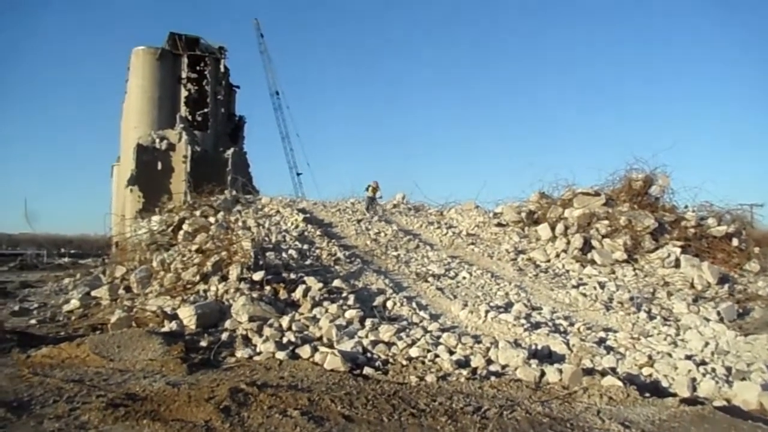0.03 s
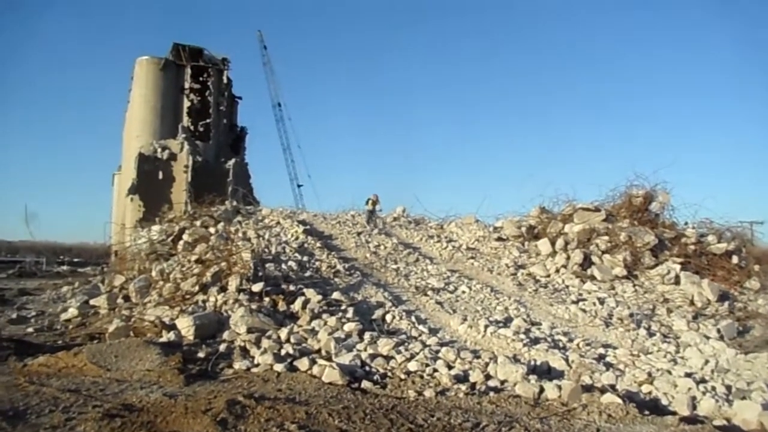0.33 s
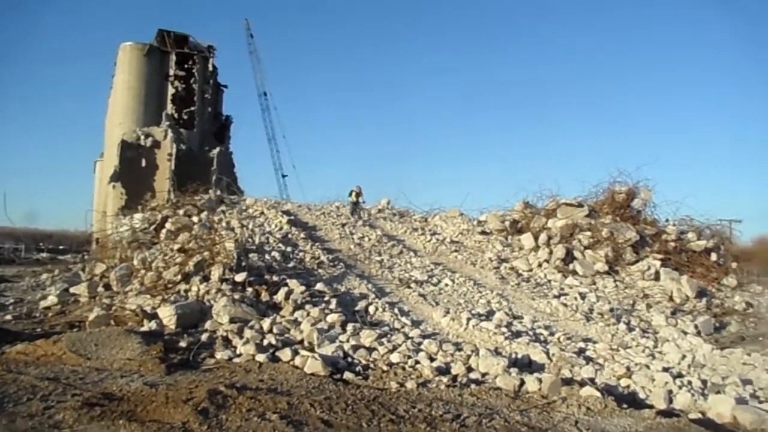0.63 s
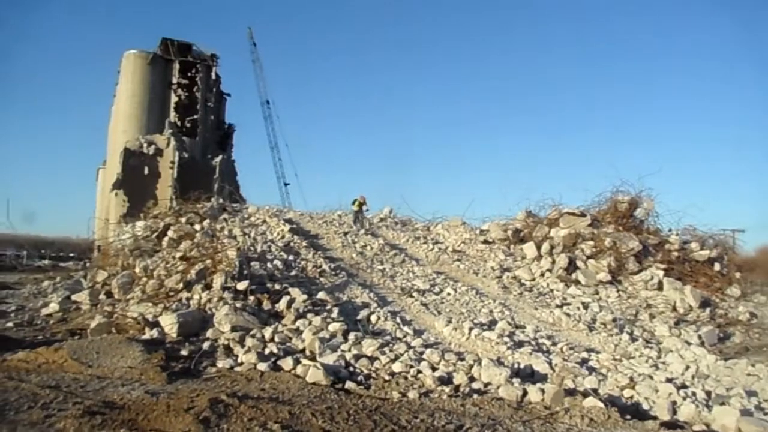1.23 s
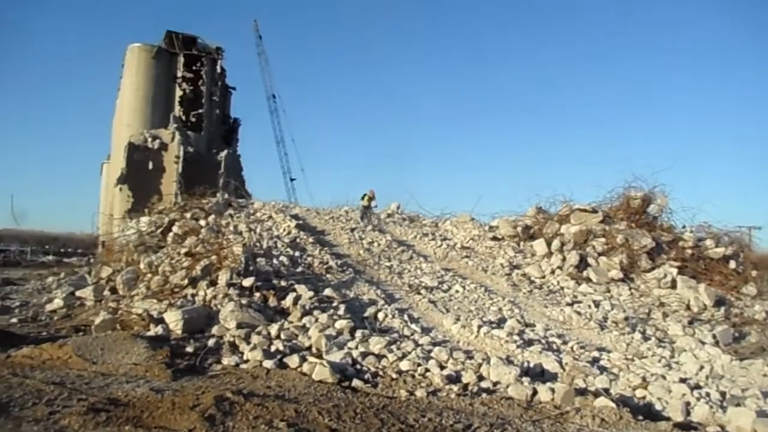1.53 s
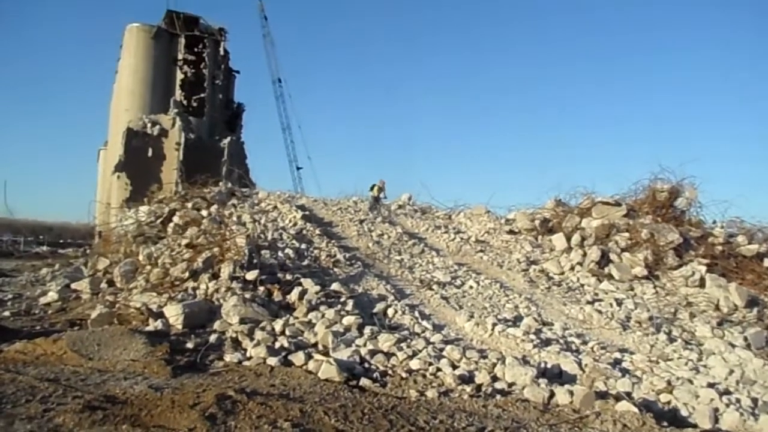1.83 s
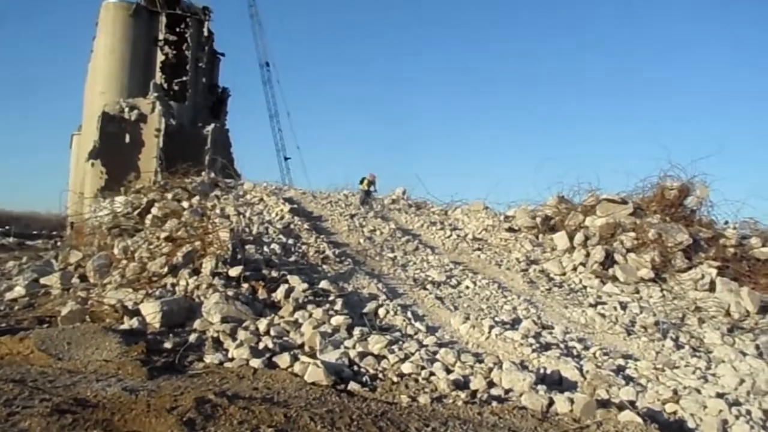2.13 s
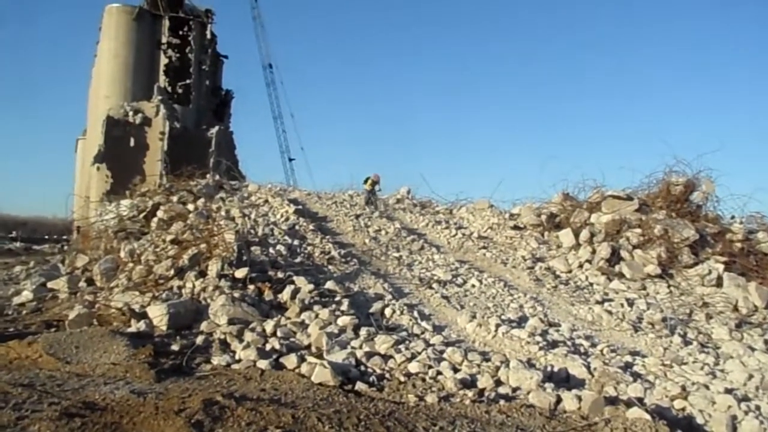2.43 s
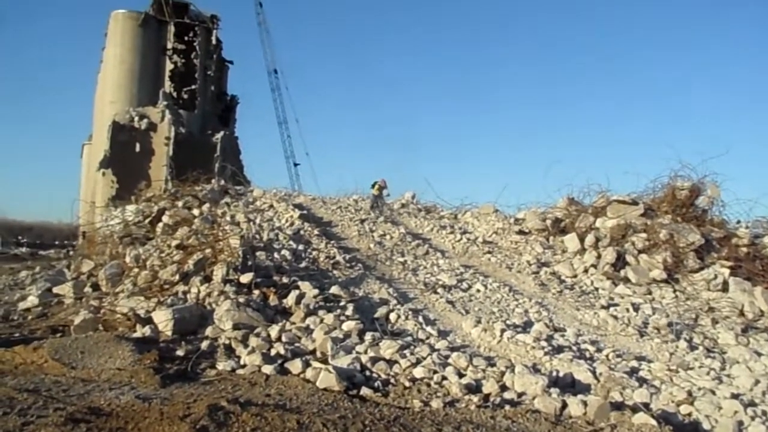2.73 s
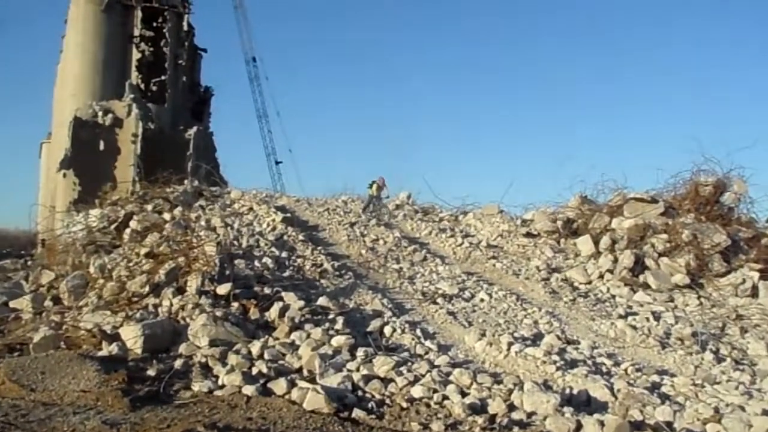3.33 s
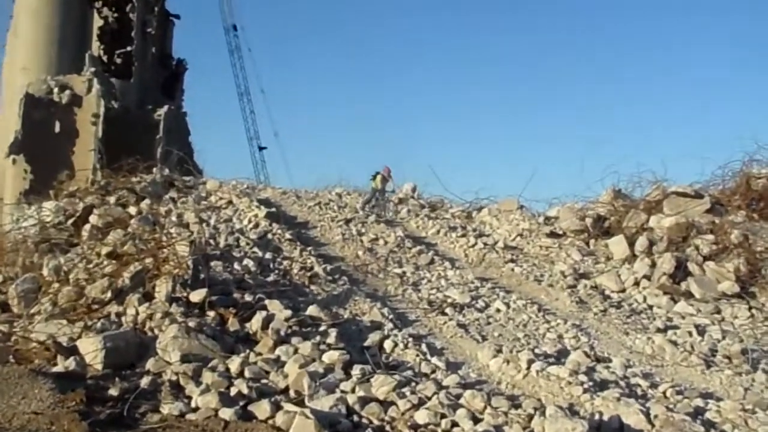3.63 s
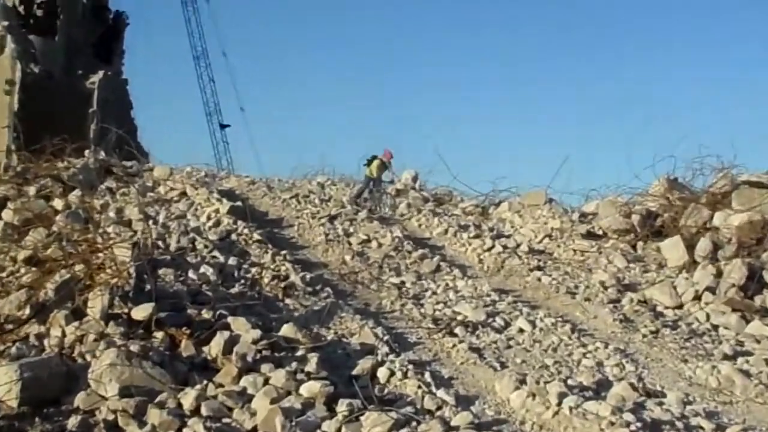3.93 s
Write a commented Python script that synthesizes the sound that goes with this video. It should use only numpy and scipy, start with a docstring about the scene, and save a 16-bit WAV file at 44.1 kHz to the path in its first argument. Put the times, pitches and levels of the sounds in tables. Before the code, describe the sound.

Wind rumbles on the microphone throughout, over a faint wash and hum of distant machinery. A camera zoom whirrs softly from 1.1 to 2.1 seconds and from 3.1 to the end, with small ticks. At 1.8 seconds a sharp, close click ducks everything, which swells back over two seconds. Stones clack lightly around 0.6 and from 2 to 2.8 seconds. Faint bird whistles come at the start and after 2.4.

```python
"""At a demolition site, wind turbulence rumbles on the microphone of a hand-held camera, over the wash
and thin hum of distant machinery, a few stony clacks and faint bird whistles. The zoom gears whirr
twice, with the sound folded to mono, and the casing gives small ticks. One sharp click rings the
casing and makes the gain control duck everything; the scene then swells back over two seconds."""
import sys
import numpy as np
from scipy import signal
from scipy.fft import rfft, irfft
from scipy.io import wavfile
from scipy.ndimage import minimum_filter1d

SR = 44100
rng = np.random.default_rng(int(sys.argv[2]) if len(sys.argv) > 2 else 0)


def master(y):
    """Save y as 16-bit WAV."""
    cut = np.clip(np.atleast_2d(y).T, -1, 1)
    pcm = np.round(cut * 32767)  # scale
    wavfile.write(sys.argv[1], SR, pcm.astype(np.int16))


N = 176400
T = np.arange(N) / SR
BIN_HZ = np.arange(N // 2 + 1) * SR / N
SIDE = np.array([[1], [-1]])  # opposite signs for left and right

def from_db(db):
    """Amplitude ratio: tenfold for every 20 dB."""
    return 10 ** (np.asarray(db) / 20)

def rms_one(x):
    """Normalisation to unit power."""
    return x / np.sqrt(np.mean(x ** 2) + 1e-20)

def noise(spectrum):
    """Spectral shaping: unit-power noise, falling 24 dB per octave beyond the end points."""
    hz, db = np.transpose(spectrum)
    octave, known = np.log2(np.maximum(BIN_HZ, 1)), np.log2(hz)
    beyond = np.abs(octave - np.clip(octave, known[0], known[-1]))
    gain = from_db(np.interp(octave, known, db) - 24 * beyond)
    return rms_one(irfft(rfft(rng.standard_normal(N)) * gain, N))

def drift(hz):
    """Random modulation: low-passed noise of unit spread."""
    return rms_one(irfft(rfft(rng.standard_normal(N)) * (BIN_HZ > 0) / (1 + (BIN_HZ / hz) ** 2), N))

def stereo_noise(spectrum, side_db):
    """Partial coherence: noise at two close ports has a common and an opposed part."""
    return noise(spectrum) + from_db(side_db) * noise(spectrum) * SIDE

def gate(start, end, ramp_s):
    """Trapezoidal window between two times."""
    return np.clip(np.minimum(T - start, end - T) / ramp_s + .5, 0, 1)

def sine(hz):
    """A unit-power tone whose phase is the integral of frequency."""
    return np.sqrt(2) * np.sin(2 * np.pi * np.cumsum(hz * np.ones(N)) / SR)

def resonate(x, hz, width_hz):
    """Second-order resonance with unit peak gain."""
    r = np.exp(-np.pi * width_hz / SR)
    feedback = [1, -2 * r * np.cos(2 * np.pi * hz / SR), r * r]
    return signal.lfilter(np.array([1, 0, -1]) * (1 - r * r) / 2, feedback, x)

# microphone hiss: (frequency [Hz], relative density [dB])
HISS_SPECTRUM = [(2000, 3.1), (6000, 0), (10000, -0.2), (14000, -3.5)]
# tones of the waking lens drive: (frequency [Hz], level [dB], decay rate [dB/s])
LENS_TONES = [(6900, -81, 30), (10400, -78, 100)]
def electronics(idle_hz=11220, wake_s=.975):
    """Self-noise: steady hiss and a faint idle whine, with two decaying tones from the lens drive."""
    idle = from_db(-90.5) * sine(idle_hz + 20 * drift(100))
    age = np.maximum(T - wake_s, 0)
    lens = sum(from_db(db - fade * age) * sine(hz + 20 * drift(60)) for hz, db, fade in LENS_TONES)
    hiss = from_db(-78) * stereo_noise(HISS_SPECTRUM, side_db=2.5)
    return hiss + idle + np.minimum(age / .005, 1) * lens

# distant wash: (frequency [Hz], relative density [dB])
WASH_SPECTRUM = [(150, 11), (300, 2), (430, 0), (620, 1), (1000, -2.5), (1400, -8.5), (2000, -15),
                 (2700, -22.5), (4500, -31), (9000, -45.5)]
# its stereo width: (frequency [Hz], side-to-mid ratio [dB])
WASH_WIDTH = [(150, -43), (400, -16.5), (800, -13), (1500, -7), (4000, -3.5)]
# its envelope: (time [s], level [dB])
WASH_LEVELS = [(0, -53.5), (.8, -55), (1.5, -55.5), (2.6, -54.5), (4, -56)]
# machine tones: (frequency [Hz], level [dB])
HUM_TONES = [(810, -71), (955, -72.5), (1620, -80)]
def machinery(flutter_db=.94, waver_db=2.5, wander_hz=3):
    """Three wavering tones lie on a broadband wash whose stereo coherence falls toward the treble."""
    mid = noise(WASH_SPECTRUM)
    width_hz, side_db = np.transpose(WASH_WIDTH)
    side_gain = from_db(np.interp(np.log(np.maximum(BIN_HZ, 1)), np.log(width_hz), side_db))
    side = irfft(rfft(noise(WASH_SPECTRUM)) * side_gain, N)
    level = from_db(np.interp(T, *np.transpose(WASH_LEVELS)) + flutter_db * drift(18))
    hum = sum(from_db(db + waver_db * drift(3.4)) * sine(hz + wander_hz * drift(6.6))
              for hz, db in HUM_TONES)
    return level * (mid + side * SIDE) + hum

# bird notes: (time [s], duration [s], start frequency [Hz], end frequency [Hz], level [dB])
BIRD_NOTES = [(0.028, 0.132, 5020, 2060, -71), (2.41, 0.059, 3750, 3000, -76),
              (2.735, 0.062, 3850, 2600, -74.5), (3.025, 0.068, 4000, 2610, -73),
              (3.308, 0.044, 3590, 2720, -65), (3.46, 0.066, 3750, 3000, -69)]
def bird(roughness=.0172):
    """Frequency modulation: each whistle glides downward, roughened by slight pitch jitter."""
    out = np.zeros(N)
    for start, length, from_hz, to_hz, db in BIRD_NOTES:
        along = np.clip((T - start) / length, 0, 1)
        pitch = from_hz * (to_hz / from_hz) ** along * (1 + roughness * drift(300))
        out += from_db(db) * np.sin(np.pi * along ** 1.44) * sine(pitch)
    return out

# stony contacts: (time [s], low mode [Hz], level [dB], high mode [Hz], level [dB], T60 [s])
STONE_CONTACTS = [(.614, 1400, -50, 3180, -53, 0.014), (.623, 2000, -62, 2350, -64, 0.034),
                  (.725, 1500, -60, 2200, -68, 0.028), (2.025, 1750, -50, 2290, -53, .022),
                  (2.524, 1447, -50, 2010, -61, .025), (2.54, 1505, -55, 3170, -53, .032),
                  (2.694, 2000, -45.5, 2550, -49, 0.017), (2.798, 1500, -59, 2150, -53.5, 0.024)]
def stones(width_hz=750, attack_s=.002, grit_db=-20):
    """Impact excitation: each gritty contact drives two heavily damped resonances."""
    out = np.zeros(N)
    for start, low_hz, low_db, high_hz, high_db, t60 in STONE_CONTACTS:
        age, grit = np.maximum(T - start, 0), rng.standard_normal(N)
        envelope = np.minimum(age / attack_s, 1) * from_db(-60 * np.maximum(age - attack_s, 0) / t60)
        for hz, db in (low_hz, low_db), (high_hz, high_db):
            broad = resonate(grit, hz, width_hz)
            ring = resonate(broad, hz, width_hz)
            out += from_db(db) * envelope * (rms_one(ring) + from_db(grit_db) * rms_one(broad))
    return out

# buffeting at the microphone: (frequency [Hz], relative density [dB])
WIND_SPECTRUM = [(11, -30), (18, -2.5), (38, 1), (59, 1.5), (78, -3.5), (125, -17), (330, -36),
                 (430, -46.5), (730, -120)]
# wind strength: (time [s], level [dB])
GUST_LEVELS = [(0, -38), (.42, -41.5), (.72, -38), (.79, -46.5), (.87, -36.5), (1.35, -40.5), (1.62, -36.5),
               (1.79, -34), (1.88, -38), (2.0, -31.5), (2.11, -42.5), (2.2, -36), (2.35, -31.5),
               (2.55, -33.5), (2.8, -33.5), (3.1, -36.5), (3.45, -39.5), (4, -37.5)]
def wind(buffet_db=.5, leftward_db=.57):
    """Turbulent pressure fluctuations rumble with the gusts, a little stronger on the left."""
    level = from_db(np.interp(T, *np.transpose(GUST_LEVELS)) + buffet_db * drift(9.3))
    return level * stereo_noise(WIND_SPECTRUM, side_db=-11) * from_db(SIDE * leftward_db)

# motor runs: (start [s], end [s], level [dB], swell [dB/s])
MOTOR_RUNS = [(1.112, 2.146, -64.5, 0.5), (3.117, 4.1, -63.5, 2)]
# gear noise through the casing: (frequency [Hz], relative density [dB])
GEAR_SPECTRUM = [(1180, -24.5), (1650, -3), (2100, -6), (2450, -6), (2820, -3), (3100, -4.5), (3480, -1.7),
                 (4330, -6.5), (4800, -8), (5440, -10.5), (5910, -9), (6430, -12.5), (6900, -8.5),
                 (7600, -13.5), (8150, -8.5), (8650, -8), (9080, -15.5), (9450, -10), (10300, -12),
                 (11150, -16.5), (11700, -15), (14000, -18)]
# gear train resonances: (frequency [Hz], bandwidth [Hz])
GEAR_MODES = [(2820, 150), (3480, 200), (3950, 220), (4350, 260), (6900, 260), (8600, 350), (9550, 300)]
# the lens scuffs as it wakes and takes up: (time [s], duration [s], level [dB])
LENS_SCUFFS = [(0.609, 0.014, -64.5), (0.934, 0.023, -56.5), (1.117, 0.03, -54.5), (2.976, 0.019, -53),
               (3.124, 0.02, -58)]
# scuffing friction: (frequency [Hz], relative density [dB])
SCUFF_SPECTRUM = [(500, 20), (1500, 9), (3500, 3), (5000, -1), (7000, -1.5), (10000, -5), (14000, -4)]
def zoom_motor(mesh_hz=184, rattles_per_s=90, rattle_db=-7):
    """Gear meshing modulates the motor noise; random knocks ring the gears, and the lens scuffs."""
    running = sum(from_db(db + swell * (T - start)) * gate(start, end, ramp_s=.018)
                  for start, end, db, swell in MOTOR_RUNS)
    mesh = sine(mesh_hz * (1 + .025 * drift(8.8)))
    flutter = from_db(mesh + .7 * drift(200) + .3 * drift(7.1))  # tooth ripple, roughness, slow sway
    knocks = rng.random(N) < rattles_per_s / SR
    rattle = sum(resonate(knocks * rng.standard_normal(N) + 1e-18, hz, width) / hz
                 for hz, width in GEAR_MODES)
    whirr = flutter * noise(GEAR_SPECTRUM) + from_db(rattle_db) * rms_one(rattle)
    scuffing = sum(from_db(db) * gate(start, start + length, ramp_s=.0056)
                   for start, length, db in LENS_SCUFFS)
    return running * whirr + scuffing * from_db(2 * drift(160)) * noise(SCUFF_SPECTRUM)

def switch_pop(start=2.3095, db=-30.5, t60=.005):
    """Switching transient: the return to stereo leaves a small step that decays exponentially."""
    age = T - start
    return (age >= 0) * from_db(db - 60 * np.abs(age) / t60)

# small camera ticks, a knock and rasps as the zoom starts, and the click's bounces:
# (time [s], tap peak [dB], frequency [Hz], bandwidth [Hz], friction T60 [s])
CASING_TICKS = [(1.13, -46, 546, 160, 0.068), (1.134, -48, 6900, 1200, 0.12),
                (1.811, -42, 4000, 2490, 0.021), (1.834, -21, 6000, 2510, 0.0067),
                (1.8395, -25.5, 4990, 3000, 0.0047), (1.846, -28.5, 4480, 3500, 0.0043),
                (1.858, -39.5, 2480, 2000, 0.0095), (3.142, -46.5, 7000, 1600, .09),
                (3.228, -52.5, 6600, 1500, 0.068), (3.469, -49.5, 10100, 1000, 0.018),
                (3.565, -52.5, 10100, 1000, 0.018), (3.566, -45.5, 3000, 1600, .018),
                (3.702, -37, 3770, 3200, 0.015), (3.703, -51, 11500, 2500, .015),
                (3.772, -51.5, 10200, 1000, 0.016), (3.773, -44, 3000, 2000, .015),
                (3.94, -43, 3070, 1340, 0.023)]
def casing_ticks(friction_db=-12.5, rise_s=.00065):
    """Impulse and friction: a tap and a dying trace of noise pass through one broad resonance."""
    out = np.zeros(N)
    for start, db, hz, width, t60 in CASING_TICKS:
        drive = np.array([np.arange(N) == int(start * SR), rng.standard_normal(N)]) + 1e-18
        tap, friction = resonate(resonate(drive, hz, width), hz, width)
        dying = np.clip((T - start) / rise_s, 0, 1) * from_db(friction_db - 60 * np.abs(T - start) / t60)
        out += from_db(db) * (tap / np.abs(tap).max() + dying * rms_one(friction))
    return out

# casing resonances: (frequency [Hz], relative level [dB], T60 [s])
CASING_MODES = [(2200, -16.5, .004), (3000, -10, 0.0035), (4750, -14.5, 0.0035), (5770, -20.5, 0.0042),
                (7000, -29.5, .003), (11500, -13, 0.0025)]
# friction around the snap: (frequency [Hz], relative density [dB])
GRIND_SPECTRUM = [(200, -4), (1200, -8.5), (2500, 0.5), (6000, -4.5), (8500, -12.5), (14000, -13.5)]
def casing_click(start=1.8328, gain_db=1.5, grind_db=-23.5, grind_rise_s=.0018, grind_t60=.04):
    """Impulse response: a hard snap rings the casing's modes for milliseconds, amid a brief grind."""
    age = np.maximum(np.arange(N) - int(start * SR), -1) / SR
    rings = sum(from_db(db - 60 * np.abs(age) / t60) * np.cos(2 * np.pi * hz * age)
                for hz, db, t60 in CASING_MODES)
    impulse = from_db(-4) * (age == 0)
    low_cut = signal.butter(1, 800, "high", fs=SR, output="sos")
    snap = signal.sosfilt(low_cut, rings * (age >= 0) + impulse + 1e-18)
    # all-pass dispersion: the casing slightly delays the snap's middle frequencies
    smeared = snap - 2 * resonate(snap + 1e-18, hz=4000, width_hz=3500)
    rise = np.exp(np.minimum(T - start, 0) / grind_rise_s)
    grind = rise * from_db(grind_db - 60 * np.abs(age) / grind_t60) * noise(GRIND_SPECTRUM)
    return from_db(gain_db) * smeared + grind

def scene():
    """Superposition: wind, wash and hiss have stereo width; all else sits in the middle."""
    outdoors = wind() + machinery() + bird() + stones()
    return outdoors + zoom_motor() + electronics() + casing_click() + casing_ticks() + switch_pop()

# mono intervals around the zooms: (start [s], end [s])
MONO_SPANS = [(1.101, 2.3095), (3.106, 4.1)]
def fold_to_mono(x):
    """Mid-side mixing: the camera drops the channel difference around each zoom."""
    mid = x.mean(axis=0)
    folded = sum(gate(start, end, ramp_s=.003) for start, end in MONO_SPANS)
    return mid + (x - mid) * (1 - folded)

def gain_control(x, limit_db=-16.5, attack_s=.0022, hold_s=.43, release_s=1.234):
    """Peak limiting: a peak over the limit pulls the gain down; it holds, then creeps back."""
    peak = np.abs(x).max(axis=0)
    cut = 1 - from_db(limit_db) / np.maximum(peak, from_db(limit_db))
    fading = np.maximum.accumulate(cut * np.exp(T / release_s)) * np.exp(-T / release_s)
    window = int(hold_s * SR) // 2 * 2 + 1
    held = -minimum_filter1d(-fading, window, origin=window // 2, mode="constant")
    pole = np.exp(-1 / (attack_s * SR))
    return x * (1 - signal.lfilter([1 - pole], [1, -pole], held))

def record(dry, hiss_db=-84, ceiling=1.1, cutoff_hz=14300):
    """Signal chain: mono fold, gain control, recorder hiss, soft saturation and a steep low-pass."""
    x = gain_control(fold_to_mono(dry)) + from_db(hiss_db) * noise(HISS_SPECTRUM)
    low_pass = signal.ellip(10, .2, 70, cutoff_hz, fs=SR, output="sos")
    return signal.sosfilt(low_pass, ceiling * np.tanh(x / ceiling))

dry = scene()
out = record(dry)
master(out)
```